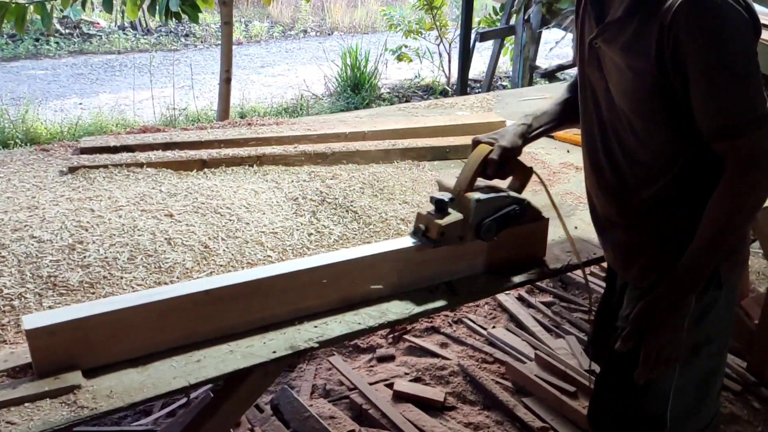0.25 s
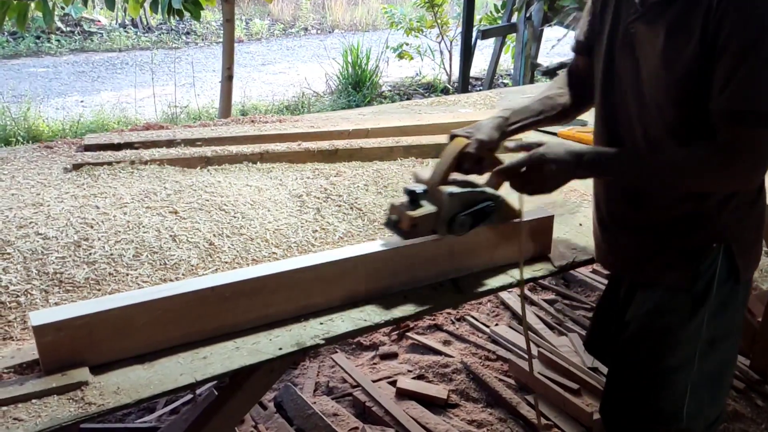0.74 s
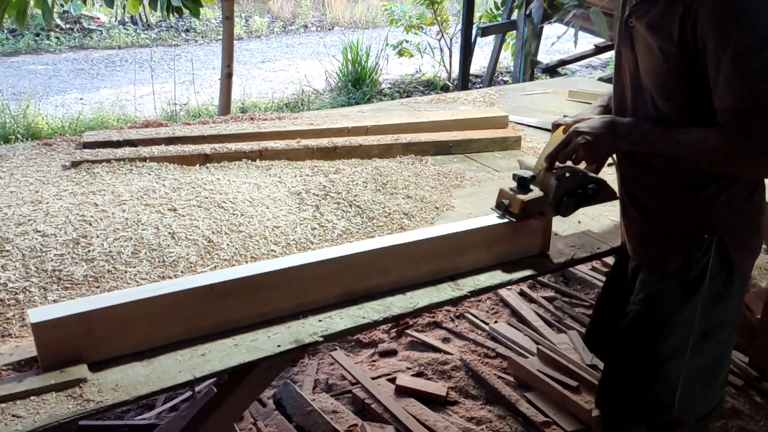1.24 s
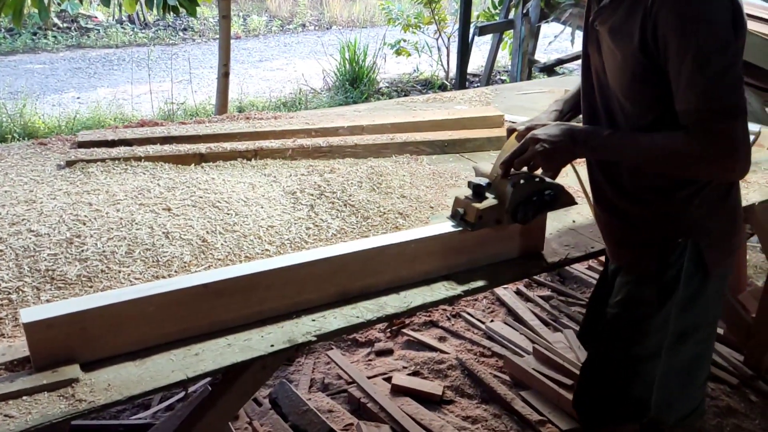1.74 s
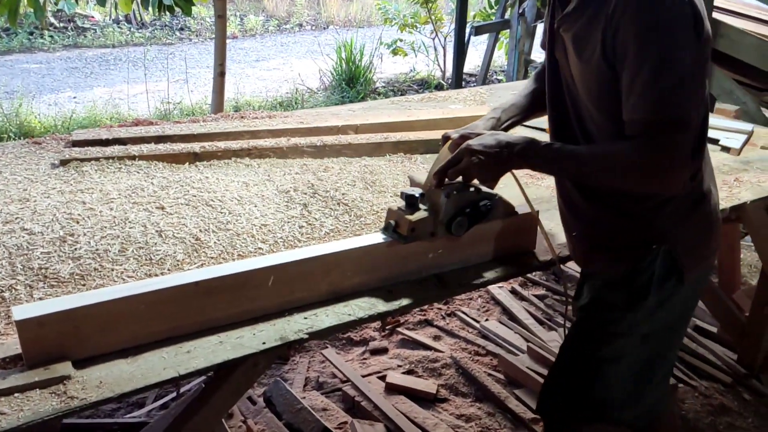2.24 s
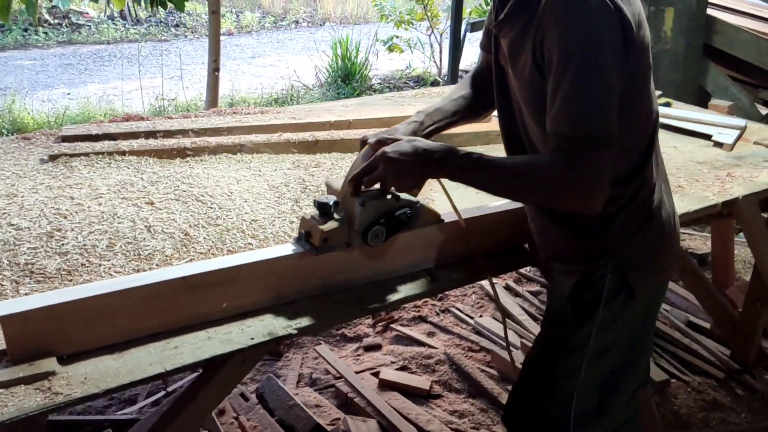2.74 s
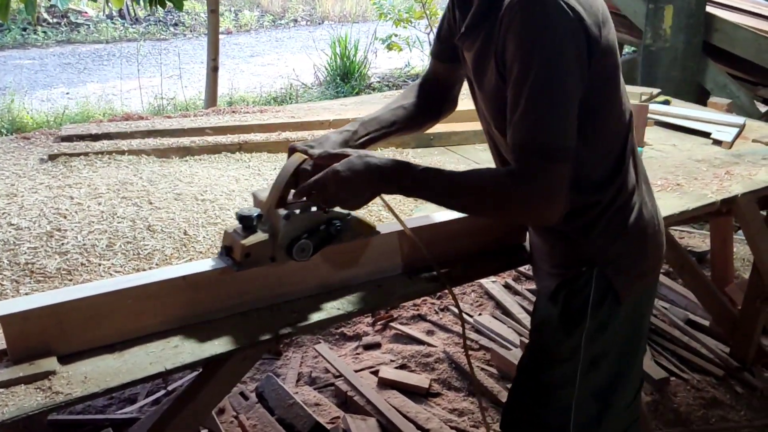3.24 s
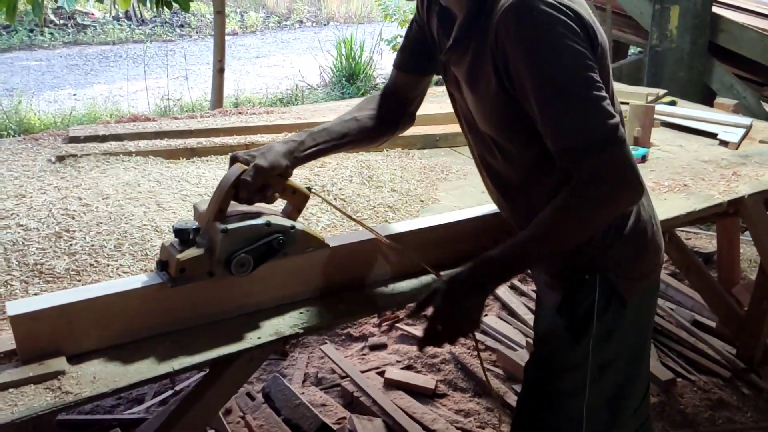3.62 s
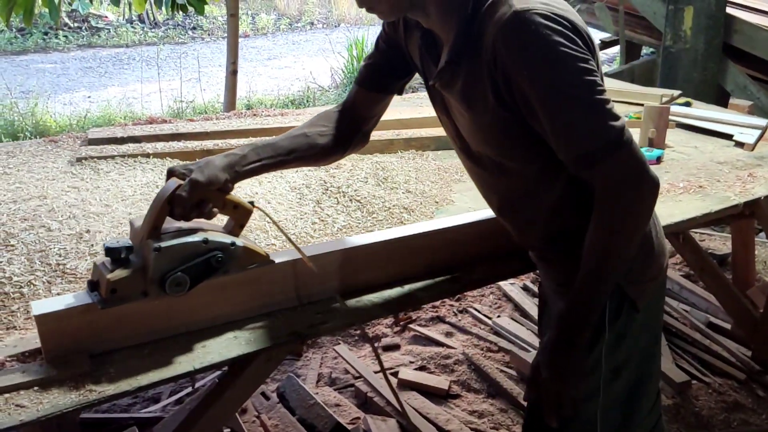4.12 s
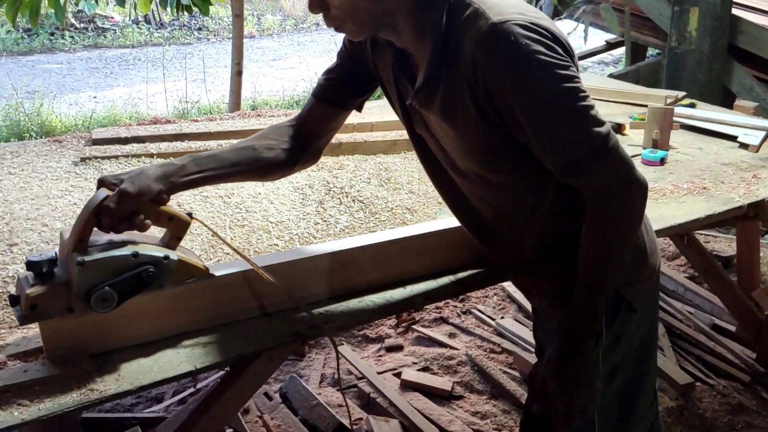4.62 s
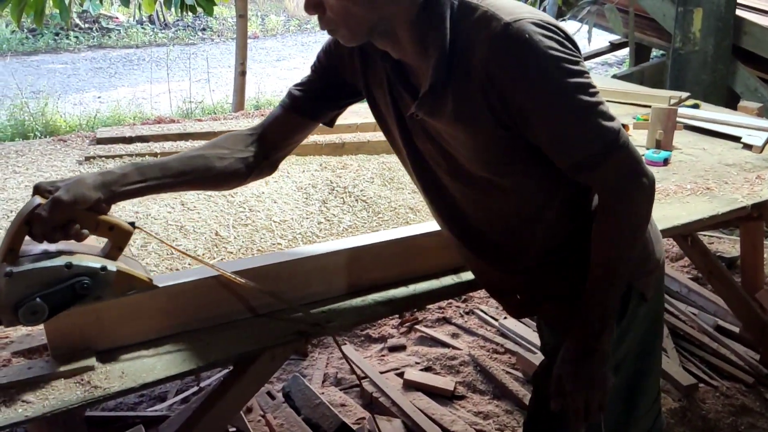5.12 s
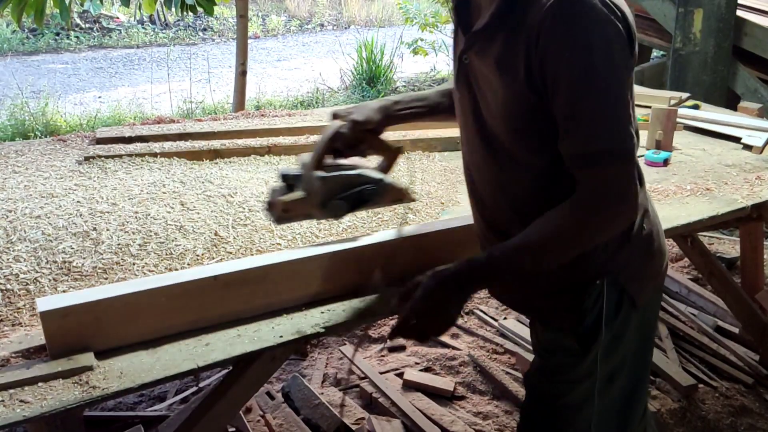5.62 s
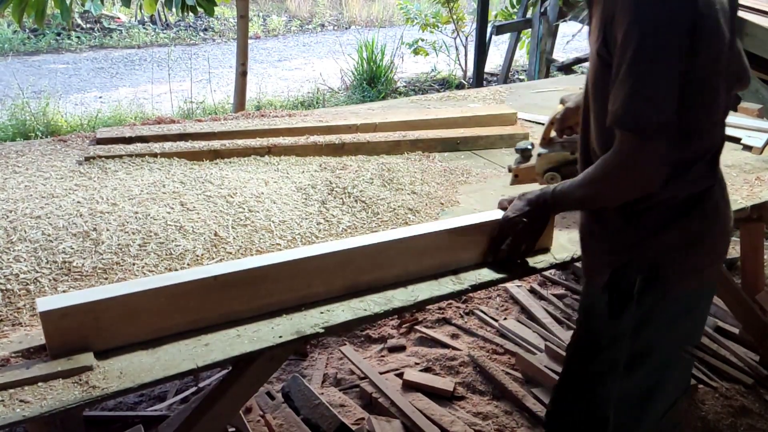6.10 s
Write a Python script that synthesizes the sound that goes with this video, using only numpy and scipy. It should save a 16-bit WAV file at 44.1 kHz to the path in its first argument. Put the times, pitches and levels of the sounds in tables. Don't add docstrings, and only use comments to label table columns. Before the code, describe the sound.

A handheld electric planer rasps along a wooden beam in one short and one long stroke, then lifts off and whines down.

```python
import sys
import numpy as np
from scipy import signal
from scipy.io import wavfile
from scipy.ndimage import uniform_filter1d

SR = 44100
rng = np.random.default_rng(int(sys.argv[2]) if len(sys.argv) > 2 else 0)


def store_pcm(level_fs):
    pcm = np.round(np.clip(level_fs, -1, 1) * 32767).astype(np.int16)
    wavfile.write(sys.argv[1], SR, np.atleast_2d(pcm).T)


def convert_level_to_amplitude(level_db):
    exponent = np.asarray(level_db, float) / 20
    return 10 ** exponent


N = 280476
T = np.arange(N) / SR
HZ = np.fft.rfftfreq(2048, 1 / SR)


def evened(x, size=None):
    power = np.atleast_2d(x).mean(0) ** 2
    mean_power = uniform_filter1d(power, size) if size else power.mean()
    return x / np.sqrt(mean_power + 1e-12)


def curve(rows, column):
    return np.interp(T, [r[0] for r in rows], [r[column] for r in rows])


def read(points):
    hz, value = np.transpose(points)
    return np.interp(np.log(HZ + 1), np.log(hz + 1), value)[:, None]


def slow(rate_hz):
    knot_s = np.arange(0, T[-1] + 1, 1 / 200)
    noise = uniform_filter1d(rng.standard_normal(len(knot_s)), max(int(200 / rate_hz), 1))
    return np.interp(T, knot_s, evened(noise))


def bumps(rows):
    t = T[::64]
    swells = (height * np.exp(-.5 * ((t - s) / half_s) ** 2) for s, half_s, height in rows)
    return np.interp(T, t, sum(swells, 0 * t))


# start_s, end_s
LIFTS = [
    (.745, 1.31),
    (5.235, 6.4),
]


def lifted(spans=LIFTS):
    ramp_s = 0.0059
    return sum(np.interp(T, [a, a + ramp_s, b, b + ramp_s], [0, 1, 1, 0]) for a, b in spans)


# start_s, speed_hz
DRUM_SPEED = [(0, 230), (.46, 232.5), (.56, 219.9), (.66, 218.1), (1.32, 277), (1.42, 271.8), (1.87, 237.3),
              (2.13, 230.4), (2.42, 209.1), (2.52, 216), (2.68, 221.2), (3.08, 206), (3.38, 205.7),
              (3.67, 213.4), (3.86, 215.4), (4.35, 209.5), (4.82, 213.8), (5.0, 223.4)]
# start_s, end_s
RACES = [
    (.66, 1.31),
    (5.01, 5.336),
]


def drum():
    free_hz, race_s, coast_hz_per_s = 290.9, .41, 80
    hz = curve(DRUM_SPEED, 1)
    for start_s, end_s in RACES:
        elapsed_s = np.clip(T, start_s, end_s) - start_s
        race = free_hz - (free_hz - hz[round(start_s * SR)]) * np.exp(-elapsed_s / race_s)
        hz = np.where((T > start_s) & (T < end_s), race, hz)
    hz = np.where(T > end_s, race - coast_hz_per_s * (T - end_s), hz)
    return uniform_filter1d(hz, size=3500)


# pitch_hz, likeness_0_1
LIKENESS = [(100, 1), (400, 0.85), (1000, 0.29), (2500, 0.057), (8000, 0.015)]


def shed(direct=.5):
    a, b, c, d = rng.standard_normal((N // 512 + 2, 1025, 4)).T
    field = np.array([a + 1j * b, c + 1j * d])
    for _ in range(2):
        field = uniform_filter1d(uniform_filter1d(field, size=5, axis=1), size=13, axis=2)
    field /= abs(field) ** 0.42
    field /= np.sqrt(np.mean(abs(field) ** 2))
    same = np.clip(read(LIKENESS), 0, 1)
    left = direct + field[0]
    right = same * left + np.sqrt(1 - same ** 2) * field[1] * np.hypot(1, direct)
    return np.array([left, right])


def heard(x, colour_db, paths):
    z = signal.stft(x, nperseg=2048, noverlap=1536)[2]
    z = z * convert_level_to_amplitude(colour_db) * paths[:, :, :z.shape[-1]]
    return evened(signal.istft(z, nperseg=2048, noverlap=1536)[1][:, :N], size=4000)


def clicks(turns, count):
    half = np.pi * turns
    return evened(np.sin((2 * count + 1) * half) / (np.sin(half) + 1e-9) - 1)


# start_s, depth_db, deeper_blade_0_1
DEPTH = [(0, -22.5, 0), (.18, -33.5, 0.9), (.4, -33.5, 0.7), (.5, -22.5, 0.4), (.64, -27.5, 1),
         (.72, -34, 0.1), (1.33, -29.5, 0.95), (1.5, -29.5, 0.54), (1.68, -19, 0.2), (1.98, -34.5, 0.56),
         (2.23, -22, 0.55), (2.76, -27, 0.6), (3.2, -27, 0.99), (3.75, -20, 0.84), (4.2, -21.5, 0.86),
         (4.85, -19, 1), (5.1, -21.5, 1), (5.2, -34.5, 0.36)]


def strikes(turns):
    return evened(clicks(turns, 70) * curve(DEPTH, 2) + 0.62 * clicks(2 * turns, 35))


def chips(turns, bite):
    each_blade = np.exp(-(2 * turns % 1) / 0.4)
    deep_blade = 1.7 * np.exp(-(turns % 1) / 0.23)
    gate = 0.081 + bite * (each_blade + deep_blade)
    chip_size = rng.standard_normal(4000)[(2 * turns).astype(int)]
    gate = gate * convert_level_to_amplitude(0.82 * bite * chip_size)
    spray = rng.standard_normal((3, N))
    return evened(gate * (1.06 * spray[0] + spray[1:]), size=2000) * convert_level_to_amplitude(0.58 * slow(rate_hz=30))


# drum_multiple, level_db over the hiss
WHINES = [(31.5, -6), (36.6, -14), (37.7, -11), (42.7, -14), (43.8, -16), (49.5, -15)]
# start_s, end_s
CARRIED = [
    (.56, 1.132),
    (5.45, 6.4),
]


def whine(turns):
    tones = 0
    for k, db in WHINES:
        phase = 2 * np.pi * k * turns + 0.5 * slow(rate_hz=42)
        tones = tones + convert_level_to_amplitude(db + 3.2 * slow(rate_hz=8.9)) * np.cos(phase)
    tones = tones * (1 + 0.98 * np.cos(2 * np.pi * turns))
    return convert_level_to_amplitude(-19.5 + 18 * lifted() - 3.5 * lifted(CARRIED)) * tones


# centre_s, half_s, shift_hz
RING_SHIFTS = [(.05, 0.06, 600), (.5, 0.059, 300), (.64, .03, -500), (1.7, .08, -550), (2.68, .11, -850),
               (1.2, .06, -1400), (1.87, 0.072, -1900), (2.3, 0.061, -700), (2.44, .04, -1600),
               (3.97, 0.084, -700), (4.36, 0.017, -600), (5.7, 0.14, -1000), (5.97, 0.097, -700)]


def beam_ring():
    ring_hz = 4330 + bumps(RING_SHIFTS) + 296 * slow(rate_hz=12)
    frames = np.minimum(np.arange(N // 512 + 2) * 512, N - 1)
    return 7.1 * np.exp(-.5 * ((HZ[:, None] - ring_hz[frames]) / 450) ** 2)


# pitch_hz, density_db_per_hz
CUT = [(290, -43), (500, -7), (760, -51.5), (1240, -14.5), (1500, -6.5), (2260, -3.5), (2500, 3.5),
       (3630, 1), (4500, 4.5), (7500, -4.5), (9750, -14), (16500, -120)]
# pitch_hz, density_db_per_hz
TOP = [(3240, -22), (5500, -13.5), (6790, -10.5), (8780, 1), (9520, -3.5), (11100, -4), (13200, -16.5),
       (15300, -37)]
# start_s, end_s
CLEAR = [
    (.67, 1.315),
    (5.15, 6.4),
]
# centre_s, half_s, level_db
SURGES = [(.1, .03, 4), (1.0, .05, -8), (1.88, 0.038, 7), (2.3, .03, -3.5), (2.44, .04, 1.5),
          (2.54, 0.039, -4), (2.63, .04, 4), (2.96, .04, 3.5), (4.36, 0.052, 2), (5.3, .05, 6.5),
          (5.58, 0.037, -5), (6.29, 0.024, -4)]
# centre_s, half_s, level_db
SHADES = [(.1, 0.047, -2.5), (.68, 0.051, -11), (.85, 0.039, -0.5), (1.13, 0.026, -3.5), (1.42, 0.029, -2),
          (1.78, 0.11, -1), (2.1, 0.081, -1.5), (2.77, 0.045, -4.5), (3.05, 0.051, -2.5), (3.25, 0.097, -2),
          (3.95, 0.12, -2.5), (4.5, .05, -3.5), (4.94, 0.028, -1.5), (5.2, 0.02, -10.5),
          (5.52, 0.024, -2.5), (5.73, 0.053, -2.5), (6.0, .1, -2), (6.33, 0.045, -4.5)]


def blades(turns, paths):
    bite_in, bite_out = 0.93, 0.68
    bite = np.clip(bite_in + (bite_out - bite_in) * lifted(CLEAR), 0, 1)
    struck = bite * strikes(turns)
    torn = chips(turns, bite)
    rattle = (1 - bite) * clicks(MOTOR_RATIO * turns, 32)
    body = struck + 2.16 * (1.04 - bite) * torn + 0.59 * rattle
    cut = heard(body, read(CUT) + beam_ring(), paths)
    top = heard(1.25 * struck + torn + 0.29 * rattle + whine(turns), read(TOP), paths)
    idle_db = -33
    depth_db = curve(DEPTH, 1) * (1 - lifted()) + idle_db * lifted() + bumps(SURGES)
    hiss_db = -17 - 0.13 * (depth_db + 21) + bumps(SHADES) + 1.07 * slow(rate_hz=7.6)
    return convert_level_to_amplitude(depth_db + 1.18 * slow(rate_hz=9)) * cut + convert_level_to_amplitude(hiss_db) * top


MOTOR_RATIO = 1.78
# drum_multiple, level_db, lifted_extra_db
ORDERS = [(1, -40, 5), (2, -37.5, 3), (3, -54.5, 11), (4, -50.5, 14), (5, -53, 0), (6, -47.5, 6.5),
          (8, -52.5, 2.5), (10, -52.5, 10)]
# pitch_hz, level_db
HOUSING = [(190, -1.5), (215, -2), (270, 4.5), (420, -1), (540, 6.5), (750, -1.5), (900, -2), (1060, 9),
           (1200, 3), (1700, 4)]
# centre_s, half_s, level_db
GRIPS = [(.23, 0.076, 2.5), (.44, .03, 6), (.6, .07, -11), (1.2, 0.03, 2), (1.33, 0.02, -2),
         (1.86, 0.1, -2.5), (1.96, 0.021, 8), (2.25, 0.075, 4.5), (2.76, .05, -7.5), (3.2, 0.07, -0.5),
         (3.59, 0.052, 0), (4.78, 0.057, 0.5), (5.33, .07, 2), (5.77, 0.039, -1)]
# centre_s, half_s, level_db
NULLS = [
    (.37, 0.045, -11),
    (1.4, .06, -9),
    (2.0, 0.056, -23),
    (2.44, 0.014, -5),
    (2.85, 0.021, -4),
    (3.2, 0.095, -17),
    (4.97, 0.081, -19),
]
# centre_s, half_s, level_db, order
FLARES = [(.3, 0.19, 10, 4), (1.123, 0.072, 3, 4), (1.3, 0.064, -14, 4), (1.983, 0.089, 10, 4),
          (2.602, 0.047, 11, 4), (4.85, .15, 14, 4), (5.35, 0.16, 6, 4), (5.746, 0.045, -6, 4),
          (5.88, .05, 9.5, 4), (6.221, 0.098, 10.5, 4), (.9, .1, 0, 6), (1.22, 0.069, 8, 6),
          (1.485, .07, 10.5, 6), (2.22, 0.17, 5.5, 6), (3.5, 0.13, 9, 6), (5.62, 0.089, 12, 6),
          (5.8, 0.064, -12, 6), (6.14, 0.074, 9, 6), (1.261, 0.054, 15.5, 3), (1.6, 0.11, 14, 3),
          (2.719, 0.12, 11, 3), (3.607, 0.044, 12, 3), (4.799, 0.16, 11.5, 3), (4.348, .12, 6.5, 2),
          (4.92, .04, -18, 2), (5.85, 0.12, -3.5, 2)]


def hum(turns):
    hz, lift = drum(), lifted()
    body_hz, body_db = np.transpose(HOUSING)
    carried = uniform_filter1d(lifted(CARRIED), size=2000)
    carried_db = -17.5 * carried
    tones = []
    for k, db, lift_db in ORDERS:
        level_db = db + lift_db * lift + bumps(GRIPS) + np.interp(k * hz, body_hz, body_db)
        level_db = level_db + bumps(r[:3] for r in FLARES if round(r[3]) == k)
        if k == 1:
            level_db = level_db + carried_db + bumps(NULLS)
        if k in (3, 5):
            level_db = level_db + 0.42 * carried_db
        if k > 2:
            level_db = level_db + 2.5 * slow(rate_hz=5)
        tones.append((k, level_db))
    motor_db = -54.5 + 0.3777 * (hz - 230) + 12 * lift - 11 * carried
    tones += [(MOTOR_RATIO, motor_db), (2 * MOTOR_RATIO, motor_db - 9)]
    out = np.zeros((2, N))
    for k, db in tones:
        lean = 0.18 * k * slow(rate_hz=2)
        out += np.sqrt(2) * convert_level_to_amplitude(db) * np.cos(2 * np.pi * k * turns + np.array([lean, -lean]))
    return out * convert_level_to_amplitude([[-1.3], [1.2]])


# pitch_hz, density_db_per_hz
AIR = [(71, -40), (120, -23), (195, -10.5), (377, -15), (528, -1.5), (802, -7.5), (1040, 1.5), (1410, -5),
       (2450, -3.5), (3000, -22), (3900, -30), (6600, -120)]
# centre_s, half_s, level_db
PUFFS = [(.05, 0.033, -28), (.35, .12, 5.5), (.77, 0.11, 3.5), (.98, 0.036, -4), (1.88, 0.028, 7.5),
         (2.09, 0.025, 5.5), (2.36, 0.049, 3.5), (2.76, 0.061, -3), (4.36, 0.059, 4), (4.86, 0.097, 5.5),
         (5.5, .05, -5.5), (5.7, 0.043, -5), (5.97, 0.051, 3.5)]


def fan(paths):
    rush = heard(rng.standard_normal(N), read(AIR), paths)
    hiss_colour = read([(9000, -52), (12500, 3), (15500, 12)])
    hiss = heard(rng.standard_normal((2, N)), hiss_colour, paths)
    rush_db = -39 + 11.5 * lifted() + bumps(PUFFS) + 0.5 * slow(rate_hz=11) - 3.0
    return convert_level_to_amplitude(rush_db) * rush + convert_level_to_amplitude(-32) * hiss


# centre_s, half_s, level_db
GUSTS = [(.1, 0.18, 18), (.45, 0.093, 15), (.78, 0.096, 27), (1.1, .15, 22), (1.75, 0.1, 8),
         (2.5, 0.099, 13), (3.45, .07, 8), (4.75, 0.098, 17), (5.26, 0.091, 18), (5.65, .2, 3),
         (6.15, 0.4, 26.5)]


def yard():
    air = rng.standard_normal((3, N))
    air = air[0] + 0.084 * air[1:]
    lumps = 0
    for hz, db in [(46, 0), (90, -1)]:
        lumps = lumps + convert_level_to_amplitude(db) * signal.lfilter(*signal.iirpeak(hz, 3.5, fs=SR), air)
    return convert_level_to_amplitude(-67.5 + bumps(GUSTS)) * evened(lumps, size=9000)


# pitch_hz, left_minus_right_db
LEAN = [(60, -6), (110, 4), (200, -8), (380, 4.5), (700, -3.5), (1280, 0.5), (2370, -3), (4370, 3.5),
        (8060, -4.5), (14900, 15.5)]


def scene():
    turns = np.cumsum(drum() * (1 + .0022 * slow(rate_hz=22))) / SR
    balance_db = read(LEAN) * np.array([.5, -.5])[:, None, None]
    paths = shed(direct=0.079) * convert_level_to_amplitude(balance_db)
    return blades(turns, paths) + hum(turns) + fan(paths) + yard()


def band_limit(x):
    return signal.sosfilt(signal.butter(12, 15500, fs=SR, output="sos"), x)


def record(dry):
    cut = signal.sosfilt(signal.butter(2, 30, "highpass", fs=SR, output="sos"), dry)
    limited = 1.19 * np.tanh(cut / 1.43)
    return band_limit(limited)


dry = scene()
out = record(dry)
store_pcm(out)
```